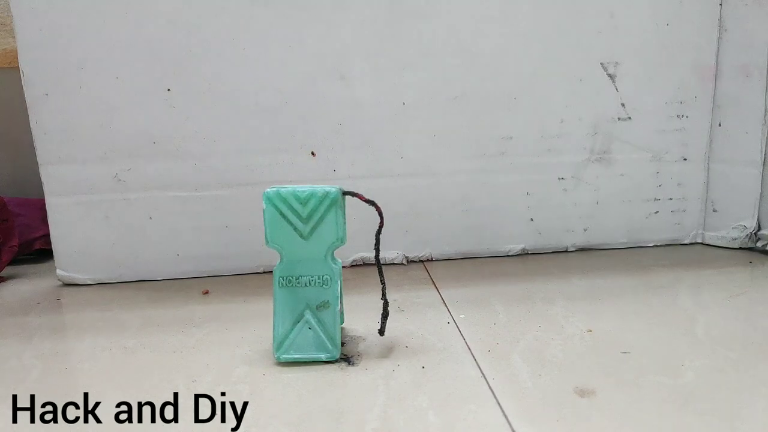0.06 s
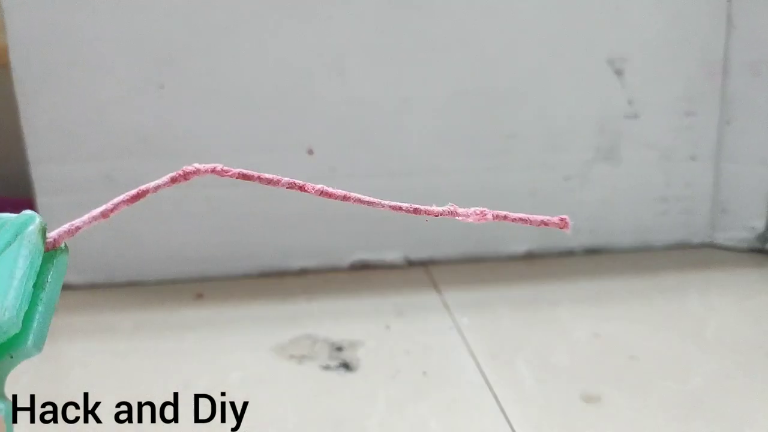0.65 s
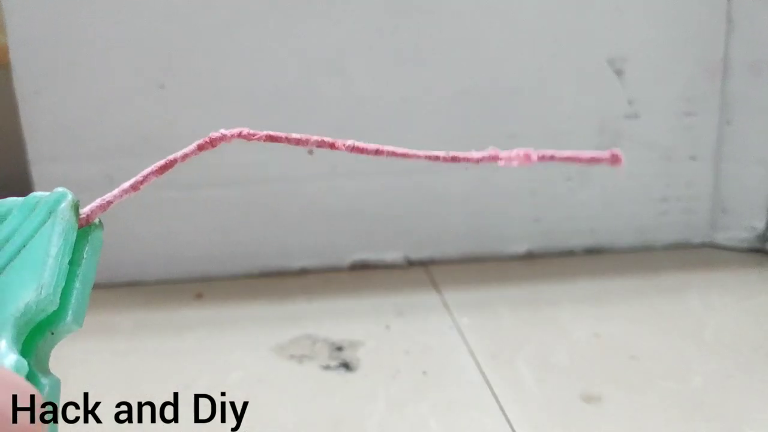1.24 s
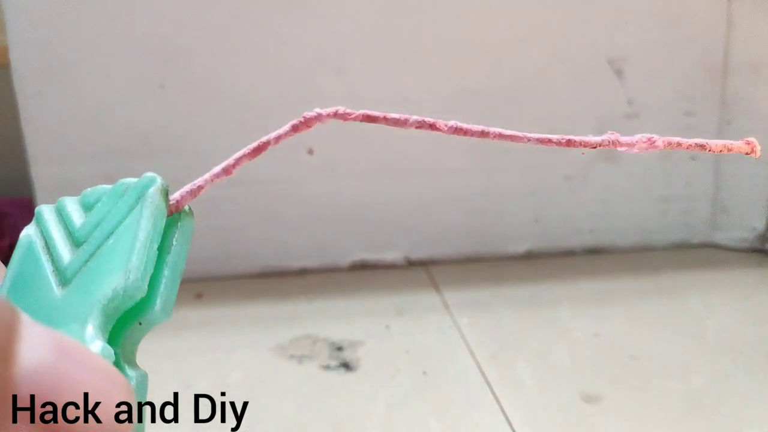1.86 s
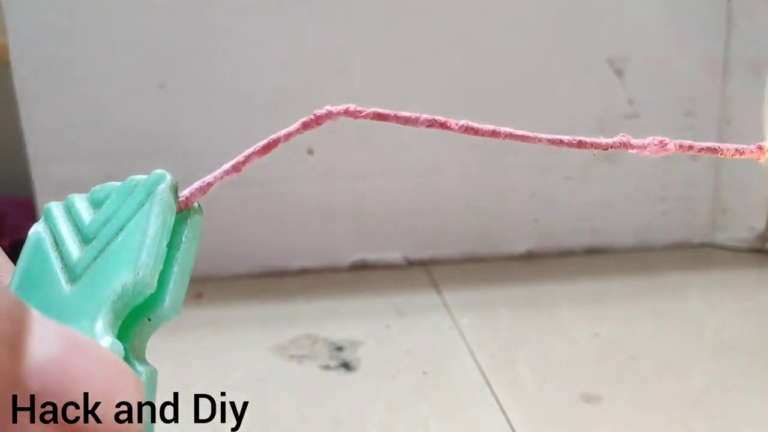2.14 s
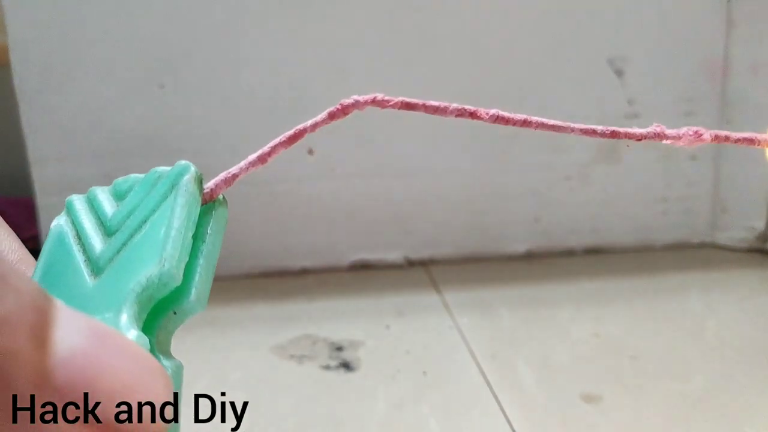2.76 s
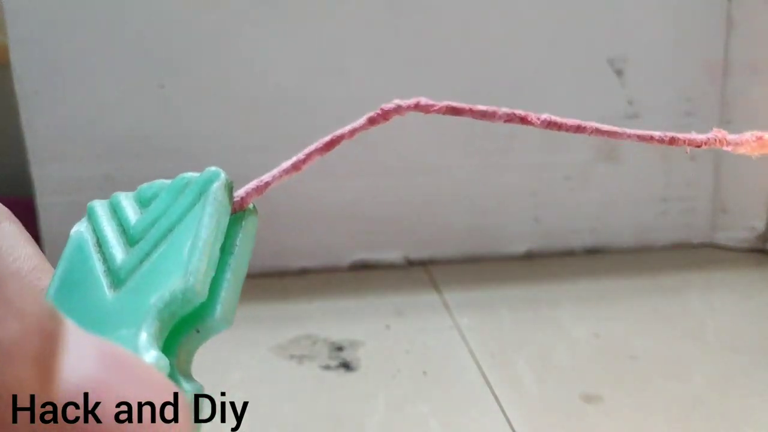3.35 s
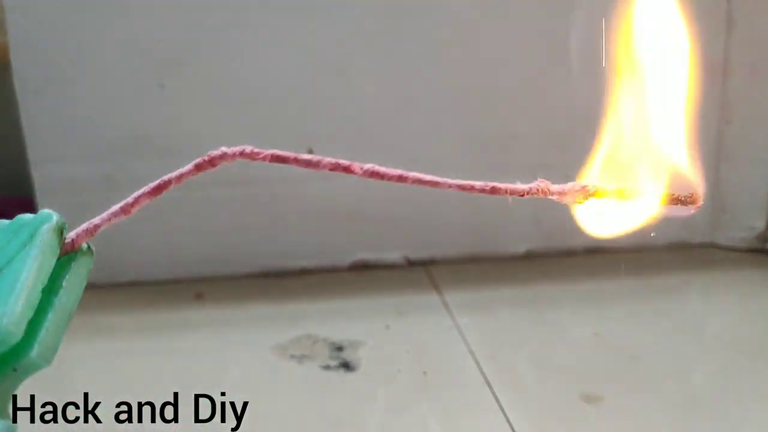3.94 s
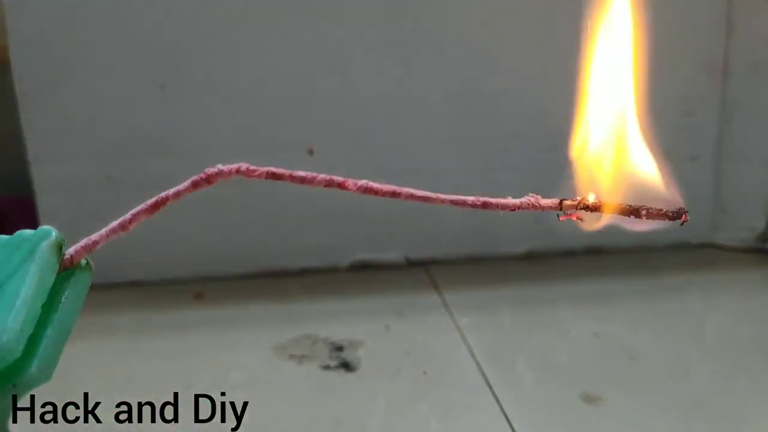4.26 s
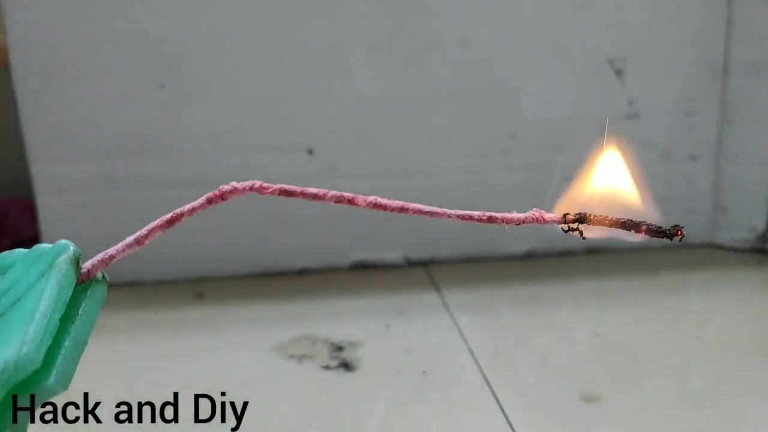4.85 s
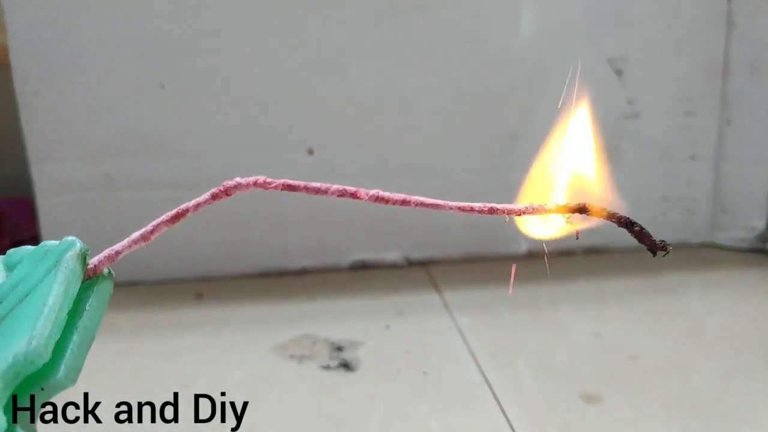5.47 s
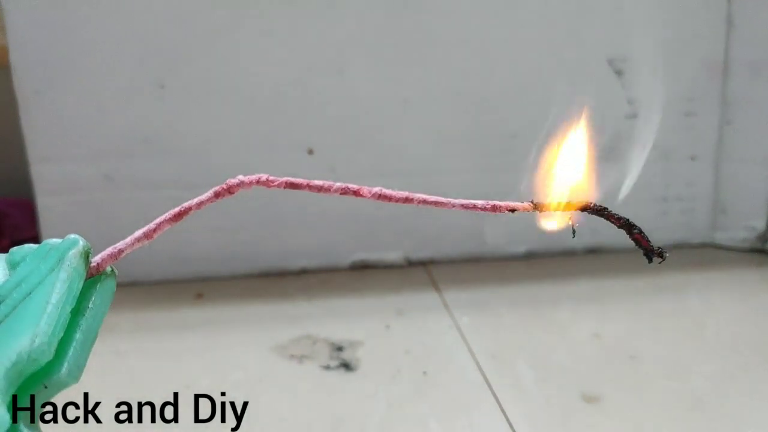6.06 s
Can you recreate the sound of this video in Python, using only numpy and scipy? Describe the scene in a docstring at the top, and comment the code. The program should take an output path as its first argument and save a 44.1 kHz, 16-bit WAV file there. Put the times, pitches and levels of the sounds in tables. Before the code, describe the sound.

The room is quiet, with faint air noise and a very low fan throb throughout. From about 0.4 seconds, fingers tick and rustle softly on a plastic casing close to the microphone, with a little low handling rumble. At 1.8 seconds a lighter clicks sharply, the loudest sound, and its gas catches with a soft low pop and brief flutter. Around 2.3 seconds a firecracker fuse begins to sizzle, building into a bright, uneven hiss with small spits and crackles. At 2.9 seconds the lighter's trigger springs back with a second sharp click. The fuse sputters most strongly between 3.2 and 4.3 seconds, with little puffs of gas, then sinks to almost nothing by 4.8 seconds. It revives just after 5 seconds, flares and spits around 5.5 seconds, and settles to a weak fizz until the end, just after 6 seconds.

```python
"""Lighting a firecracker fuse

A lighter clicks and lights a fuse close to a phone in a quiet, tiled room. Powder sizzles and spits,
escaping gas hisses, the trigger springs back, and the flame creeps along the cord, sinking and flaring.
Fingers rustle and tick on the plastic casing; a fan throbs very low in the background."""
import sys
import numpy as np
from scipy import signal
from scipy.fft import rfft, irfft
from scipy.io import wavfile

SR = 44100
rng = np.random.default_rng(int(sys.argv[2]) if len(sys.argv) > 2 else 0)


def waveform_to_disk(signal):
    """Save audio, clipped to [-1, 1], as 16-bit WAV at the path in sys.argv[1]."""
    frames = np.transpose(np.atleast_2d(signal))
    scaled = np.clip(frames, -1, 1) * 32767
    samples = np.round(scaled).astype(np.int16)
    wavfile.write(sys.argv[1], SR, samples)


N = 273861
T = np.arange(N) / SR
HZ = np.fft.rfftfreq(N, 1 / SR)


def amp(db):
    return 10 ** (np.asarray(db) / 20)


def unit_rms(x):
    return x / np.sqrt(np.mean(x ** 2) + 1e-20)


def spectrum(points, hz=HZ):
    """Interpolate (Hz, value) rows on a log-frequency axis."""
    knots_hz, values = np.transpose(points)
    return np.interp(np.log(hz + 1), np.log(knots_hz + 1), values)


def curves(rows):
    """Interpolate (seconds, values..) rows: one curve per value column."""
    times_s, *columns = np.transpose(rows)
    return [np.interp(T, times_s, column) for column in columns]


def pan(balance_db):
    """Constant-power stereo gains; positive is left."""
    ratio = np.atleast_1d(amp(balance_db))
    return np.array([ratio, np.ones_like(ratio)]) * np.sqrt(2 / (1 + ratio ** 2))


def colour(x, shape_db):
    """Filter that keeps the power of white noise: only the shape counts."""
    return irfft(rfft(x) * unit_rms(amp(shape_db)), N)


def noise():
    """Stereo white noise, alike in the bass."""
    # Each row: frequency in Hz, left-right correlation.
    coherence = [(100, 0.99), (300, 0.95), (640, 0.79), (1100, 0.32), (1550, 0.18), (2150, 0.44),
                 (4100, 0.14), (5900, -0.17), (7400, 0.033), (15000, 0)]
    left, other = rfft(rng.standard_normal((2, N)))
    alike = np.clip(spectrum(coherence), -1, 1)
    return irfft(np.array([left, alike * left + np.sqrt(1 - alike ** 2) * other]), N)


def burst(start_s, decay_s, rise_s):
    """Envelope: quick rise, exponential fall."""
    age_s = np.arange(SR // 5) / SR
    out = np.zeros(N)
    span = out[round(start_s * SR):][:len(age_s)]
    span += ((1 - np.exp(-age_s / rise_s)) * np.exp(-age_s / decay_s))[:len(span)]
    return out


def swell(start_s, hold_s, rise_s, fall_s):
    """Envelope: attack, hold, release."""
    age_s = np.maximum(T - start_s, 0)
    return (1 - np.exp(-age_s / rise_s)) * np.exp(-np.clip((age_s - hold_s) / fall_s, 0, 30))


def shower(per_s, decay_s, spread_db):
    """Power of random bursts of unequal size, mean 1."""
    sizes = amp(spread_db * np.minimum(rng.exponential(1, N), 4)) ** 2
    hits = sizes * (rng.random(N) < per_s / SR)
    power = signal.lfilter([1], [1, -np.exp(-1 / (decay_s * SR))], hits)
    return power / power.mean()


def wander(step_s):
    """Random drift, a new value every step."""
    knots_s = np.arange(0, T[-1] + step_s, step_s)
    return np.interp(T, knots_s, rng.standard_normal(N)[:len(knots_s)])


def resonance(x, hz, width_hz):
    """Double-pole resonance at unit RMS; hz may be a curve."""
    carrier = np.exp(2j * np.pi * np.cumsum(hz * np.ones(N)) / SR)
    pole = np.exp(-np.pi * width_hz / SR)
    baseband = signal.lfilter([1], np.poly([pole, pole]), x / carrier)
    return unit_rms((carrier * baseband).real)


def room(x):
    """Diffuse tail; the bass rings longest."""
    # Each row: frequency in Hz, T60 in seconds.
    reverb_times = [(200, 0.86), (1000, 0.31), (4000, 0.52), (8000, 0.41), (15000, 0.55)]
    t = T[:SR * 3 // 4]
    hz, age_s, frames = signal.stft(noise()[:, :len(t)], SR, nperseg=256)
    decay = amp(-60 * age_s / spectrum(reverb_times, hz)[:, None])
    tail = signal.istft(frames * decay, SR, nperseg=256)[1][:, :len(t)]
    tail *= np.clip(t / 0.0057, 0, 1) * (1 + 3.3 * np.exp(-t / 0.017))  # near walls answer first
    return signal.fftconvolve(x, tail / np.linalg.norm(tail[0]), axes=1)[:, :N]


def background(air_db=-56.5, fan_hz=30.5):
    """Low room air, faint hiss and a fan's throb."""
    # Spectra. Each row: frequency in Hz, relative density in dB.
    air_shape = [(20, -3.5), (45, -2.5), (70, -3.5), (120, 0.5), (200, -8), (300, -11), (450, -13.5),
                 (600, -35.5), (1000, -36), (1600, -53), (4000, -46)]
    hiss_shape = [(200, 6), (600, 13), (1100, 6), (1600, -1), (4000, -1.5), (7200, 1.5), (9000, -4),
                  (12000, -2.5), (16000, -0.5)]
    # Envelopes. Each row: time in seconds, level in dB.
    hiss_levels = [(0, -59), (.41, -60), (.44, -65), (2.2, -65.5), (6.2, -63)]
    fan_levels = [(0, -55), (.75, -54), (1.35, -65), (3.1, -48), (4.1, -48), (5.5, -42), (6.2, -46)]
    fan = np.sqrt(2) * amp(curves(fan_levels)[0]) * np.sin(2 * np.pi * fan_hz * T)
    hiss = amp(curves(hiss_levels)[0]) * colour(noise(), spectrum(hiss_shape))
    return amp(air_db) * colour(noise(), spectrum(air_shape)) + hiss + fan


def grip_envelopes():
    """Each shift of grip swells and fades in rustle, rumble, drone and scrape."""
    # Each row: start and hold in seconds, then rustle, rumble, drone and scrape in dB.
    grips = [(0.887, 0.041, -77, -53, -54, -88), (0.976, 0.22, -62, -70, -52.5, -85),
             (1.217, 0.16, -60.5, -74, -64, -72), (1.474, 0.15, -68, -54, -59, -90),
             (1.59, .25, -64.5, -61, -61, -88), (1.923, .14, -55, -55.5, -70, -80),
             (2.1, 0.28, -64.5, -62, -68, -87)]
    power = sum((amp(levels_db)[:, None] * swell(start_s, hold_s, rise_s=0.0098, fall_s=0.053)) ** 2
                for start_s, hold_s, *levels_db in grips)
    return np.sqrt(power)


def casing(drone, scrape):
    """Sliding skin sets the phone's case droning and scraping."""
    friction = noise()
    low = drone * resonance(friction, hz=71.8, width_hz=11)
    return low + scrape * resonance(friction, hz=1320, width_hz=250) * pan(4.0)


def fingers(rustle, rumble, tremor_db=-63):
    """Skin rubs and ticks on plastic while the hand jostles the phone."""
    # Each row: start in seconds, level in dB, decay in seconds, brightness from 0 to 1.
    ticks = [(.42, -50.5, 0.011, 0.3), (1.005, -54, 0.012, 1), (1.1897, -40.5, 0.0013, 0.77),
             (1.367, -48, .0018, .5), (1.498, -45.5, 0.0019, 0.7), (1.542, -49, .0017, 0.1),
             (1.609, -35, 0.011, 0.99), (1.7402, -45, .0024, 0), (1.752, -46.5, .003, 0),
             (2.028, -41.5, .0037, 0), (2.239, -49, 0.0041, 0)]
    # Spectra. Each row: frequency in Hz, relative density in dB.
    rustle_shape = [(300, -1), (1400, -4.5), (2500, -1.5), (5000, -0.5), (7000, 1), (8500, -5),
                    (12000, 4.5), (16000, -6)]
    slip_shape = [(1000, -18.5), (7000, -32), (9300, -5.5), (11000, -4), (14000, -8.5), (16000, -18)]
    rumble_shape = [(20, -9), (52, -8), (70, -0.5), (92, -7), (130, -7), (250, -25), (600, -40.5)]
    dull, sharp = np.zeros((2, N))
    for start_s, db, decay_s, brightness in ticks:
        touch = amp(db) * burst(start_s, decay_s, rise_s=0.0002 + 45 * decay_s ** 2)  # long slips: soft
        dull += np.sqrt(1 - brightness) * touch
        sharp += np.sqrt(brightness) * touch
    grain = np.sqrt(0.55 + 0.13 * shower(per_s=150, decay_s=0.0006, spread_db=4.0))
    rub = colour(noise() * np.hypot(rustle * grain, dull), spectrum(rustle_shape))
    slip = colour(noise() * sharp, spectrum(slip_shape))
    jostle = np.hypot(rumble, amp(tremor_db)) * colour(noise(), spectrum(rumble_shape))
    return (rub + slip) * pan(3.9) + jostle


def ignition(flutter_db=-45.0):
    """Gas catches with a soft low pop and a brief flutter of flame."""
    # Spark, catching gas, hot air. Each row: start in seconds, peak pressure, rise in seconds, pan in dB.
    pulses = [(1.8458, -0.051, 0.0011, 23), (1.845, -0.032, 0.016, 24), (1.908, -0.049, 0.0024, 2),
              (1.882, 0.056, 0.1, 27)]
    pop = np.zeros((2, N))
    for start_s, pressure, rise_s, pan_db in pulses:
        age = np.maximum((T - start_s) / rise_s, 0)
        pop += pan(pan_db) * pressure * age ** 2 * np.exp(2 * (1 - age))
    flame_db = spectrum([(40, -6), (170, -4), (350, -6), (560, -1), (800, -27), (3000, -47)])
    flutter = colour(noise(), flame_db) * burst(1.902, decay_s=0.029, rise_s=0.003)
    return pop + amp(flutter_db) * flutter


def lighter():
    """The trigger goes down, snaps and springs back: each click cracks, rings the body and echoes."""
    # Each row: start in seconds, ring and crack in dB, T60 factor, room send in dB, tilt in dB/octave.
    clicks = [(1.8194, -38.5, -35, 0.72, -4, 0), (1.844, -22, -37, 0.66, -16, -3),
              (1.846, -1, -10, 0.8, -10.5, -0.5), (1.8480, -10, -14.5, 0.77, -15, -4),
              (1.8497, -17, -38, 0.68, -15, -7.5), (2.9185, -3, -15.5, 0.46, -13.5, -1.5),
              (2.9213, -18, -24, 0.82, -21, -7)]
    # Body modes. Each row: frequency in Hz, relative level in dB, base T60 in seconds, pan in dB.
    modes = [(1350, -22, 0.0032, 5), (2140, -23, 0.0035, 0), (3010, -18.5, 0.013, 22),
             (3540, -28, 0.0047, 12), (4680, -7, 0.0084, 2), (5320, -10, 0.013, -6),
             (6250, -19.5, 0.0077, -15), (7100, -7.5, 0.016, -9), (8000, -17, 0.013, 1.5),
             (9300, -17.5, 0.011, 3), (11180, -9.5, 0.018, 1.5), (11930, -9.5, 0.012, 4.5),
             (12600, -2, 0.0096, 9), (14590, -10, 0.014, 7)]
    # Spectra of the crack and of sideways radiation. Each row: frequency in Hz, relative level in dB.
    crack_shape = [(100, -20), (800, -10.5), (1500, -0.5), (3500, 5), (8000, 9), (11000, -3.5),
                   (16000, -16)]
    sideways_shape = [(300, -17.5), (1500, -25), (2200, -6.5), (3000, -2.5), (3900, -11), (5400, 4.5),
                      (6700, 3), (8600, -5), (11800, 1), (13500, -4), (16000, -8)]
    t = np.arange(SR // 20) / SR
    cracks = sum(amp(db) * burst(start_s, decay_s=0.0015, rise_s=0.0001) for start_s, _, db, *_ in clicks)
    direct = colour(noise() * cracks, spectrum(crack_shape)) * pan(6.4)
    send = np.zeros((2, N))
    for start_s, ring_db, _, t60_factor, send_db, tilt_db in clicks:
        ring = np.zeros((2, len(t)))
        for hz, db, t60_s, pan_db in modes:
            envelope = amp(db + tilt_db * np.log2(hz / 7000) - 60 * t / (t60_s * t60_factor))
            ring += pan(pan_db) * envelope * np.sin(2 * np.pi * (hz * t + rng.random((2, 1))))
        onset = round(start_s * SR)
        direct[:, onset:onset + len(t)] += amp(ring_db) * ring * (1 - np.exp(-t / 0.00028))
        send[:, onset] += amp(ring_db + send_db) * np.linalg.norm(ring[0])
    return direct + room(colour(send, spectrum(sideways_shape))) * pan(-3.5)


def scatter(x, paths=5, sway_s=0.00006, step_s=0.45):
    """Hand and casing reflect the treble; the paths sway, so ripples slide through the hiss."""
    treble = irfft(rfft(x) / (1 + (2600 / (HZ + 1)) ** 4), N)
    knots_s = np.arange(0, T[-1] + 1, step_s)
    out = x.copy()
    for side in range(2):
        for delay_s in rng.uniform(0.000789, 0.005, paths):
            sway = np.interp(T, knots_s, rng.standard_normal(len(knots_s)))
            out[side] += 0.29 * np.interp(T - delay_s - sway_s * sway, T, treble[side])
    return out


def corner_ripple_db():
    """Echoes off the floor and a cardboard wall add and cancel."""
    # Each row: centre and half width in Hz, gain in dB.
    bands = [(190, 15, 5), (461, 107, 4), (707, 107, -12), (878, 46, 7), (1283, 150, 3), (1530, 115, -6.5),
             (2180, 240, 2), (2514, 127, -12), (3310, 190, -5), (3750, 150, -3), (4000, 85, 3),
             (6590, 170, 5), (8000, 280, -8), (9950, 130, 3.5)]
    return sum(db * np.exp(-((HZ - hz) / width_hz) ** 2) for hz, width_hz, db in bands)


def hand_shield(x, hz=1520, width_hz=166):
    """The echo of the hand shielding the tip cancels part of one band common to both channels."""
    # Each row: time in seconds, share cancelled.
    depths = [(2.3, 0.9), (3.05, 0.6), (3.5, 0.3)]
    common = irfft(rfft(x.mean(0)) * np.exp(-((HZ - hz) / width_hz) ** 2), N)
    return x - curves(depths)[0] * common


def burn_envelope(lit_s=2.16, catch_s=0.11):
    """Powder burns unevenly: pockets flare over a base roughened by surges, puffs and snaps."""
    # The base burn builds, sinks and revives. Each row: time in seconds, level in dB.
    base_levels = [(2.2, -67), (2.57, -60.5), (2.76, -51.5), (2.95, -51.5), (3.21, -51), (3.3, -46.5),
                   (3.46, -48), (3.52, -52.5), (3.76, -47.5), (4.12, -48.5), (4.19, -52), (4.55, -62.5),
                   (4.76, -68), (5.02, -66.5), (5.14, -60.5), (5.62, -54), (5.75, -62.5), (6.21, -61.5)]
    # Each row: start in seconds, level in dB, hold in seconds.
    pockets = [(2.327, -51.5, 0.025), (2.449, -51.5, 0.035), (2.498, -55.5, .016), (3.264, -54, .017),
               (3.353, -45, 0.011), (3.439, -43, 0.02), (4.07, -46.5, 0.026), (4.274, -47.5, 0.035),
               (4.48, -56.5, 0.035), (5.145, -54, .012), (5.363, -49, 0.009), (5.419, -49, 0.013),
               (5.491, -53, 0.081), (5.58, -51, 0.083), (5.827, -56.5, .008), (5.941, -58, 0.022)]
    flares = sum(amp(db) * swell(start_s, hold_s, rise_s=0.003, fall_s=0.026)
                 for start_s, db, hold_s in pockets)
    burn = np.hypot(amp(curves(base_levels)[0]), flares) * np.clip((T - lit_s) / catch_s, 0, 1)
    surges = shower(per_s=45, decay_s=0.011, spread_db=1.2)
    puffs = shower(per_s=300, decay_s=0.0025, spread_db=2.6)
    snaps = shower(per_s=700, decay_s=0.00015, spread_db=5.5)
    return burn * np.sqrt(0.19 + 0.23 * surges + 0.42 * puffs + 0.37 * snaps)


def sizzle(burn, spits, burn_gain_db=1.0, spit_gain_db=-3.5):
    """Burning powder, bursting grains and dull gusts of gas from the cord."""
    # Spectra. Each row: frequency in Hz, relative density in dB.
    powder_shape = [(60, -9), (180, 0.5), (450, 2), (1000, 1.5), (2000, -2), (3300, -4.5), (5200, -2.5),
                    (7000, -5), (8200, -1), (10000, -11), (16000, -28.5)]
    gust_shape = [(100, -37), (450, 5), (1200, 1), (1700, -8), (4000, -35)]
    # Each row: start in seconds, level in dB.
    gust_events = [(3.263, -40.5), (3.454, -35.5), (4.296, -42.5), (5.593, -41.5), (5.827, -48.5)]
    gusts = sum(amp(db) * burst(start_s, decay_s=0.012, rise_s=0.0026) for start_s, db in gust_events)
    powder_db = spectrum(powder_shape) + corner_ripple_db()
    grain_db = powder_db + spectrum([(300, -5.5), (1500, -6.5)])
    out = amp(burn_gain_db) * colour(noise() * burn, powder_db)
    out += amp(spit_gain_db) * colour(noise() * spits, grain_db)
    return out + colour(noise() * gusts, spectrum(gust_shape) + corner_ripple_db())


def jet(burn, spits, spit_gain_db=-5.5, stray_hz=450):
    """Gas escapes with a bright rush, a broad whistle and a rasp that change as the tip burns open."""
    # Each row: frequency in Hz, relative density in dB.
    rush_shape = [(5000, -30.5), (8000, -17.5), (9800, -6.5), (12500, -3), (14000, -5), (16000, -7.5)]
    # Each row: time in seconds, gain on the burn in dB, whistle in Hz, whistle and rasp re rush in dB.
    vent = [(2.3, 1, 12600, -3, -11.5), (2.85, 0.5, 12200, -2.5, -9.5), (3.15, -3, 11100, 1, -15),
            (3.42, -3, 10600, 1.5, -14), (3.6, -6.5, 12200, 4.5, -25), (4.3, -3, 11900, -4.5, -24),
            (6.2, -1, 13000, -8, -39)]
    gain_db, whistle_hz, whistle_db, rasp_db = curves(vent)
    rush = colour(noise(), spectrum(rush_shape) + corner_ripple_db())
    whistle = resonance(noise(), whistle_hz + stray_hz * wander(step_s=0.07), width_hz=1900)
    rasp = 1.09 * resonance(noise(), hz=3650, width_hz=1600)
    rasp += 0.31 * resonance(noise(), hz=5730, width_hz=2000)
    drive = np.hypot(amp(gain_db) * burn, amp(spit_gain_db) * spits)
    return drive * (rush + amp(whistle_db) * whistle + amp(rasp_db) * rasp)


def fuse():
    """One sputtering burn drives both sizzle and jet; the flame drifts slightly right."""
    # Single powder grains bursting. Each row: start in seconds, level in dB, decay in seconds.
    grains = [(2.457, -39, 0.0056), (2.505, -37.5, 0.0065), (2.668, -36, 0.0025), (2.7, -35, .004),
              (2.7295, -34.5, 0.0053), (2.794, -30.5, 0.0016), (2.86, -29, 0.0035), (3.0145, -30, 0.0011),
              (3.041, -30.5, 0.0031), (3.2556, -31, 0.0035), (3.407, -29.5, 0.0034), (4.214, -37.5, 0.0044),
              (5.0502, -40.5, .0028), (5.079, -36.5, .0045), (5.297, -43, 0.0032), (5.428, -32.5, 0.0074),
              (5.8299, -39, 0.0031)]
    # Each row: time in seconds, pan in dB.
    flame_path = [(3.4, -0.2), (3.8, -2.4)]
    burn = burn_envelope()
    spits = sum(amp(db) * burst(start_s, decay_s, rise_s=0.00069) for start_s, db, decay_s in grains)
    flame = hand_shield(sizzle(burn, spits)) + jet(burn, spits) * pan(9.2)
    return scatter(flame) * pan(curves(flame_path)[0])


def scene():
    """Fuse, fingers and lighter close by, in a quiet room."""
    rustle, rumble, drone, scrape = grip_envelopes()
    close = fuse() + fingers(rustle, rumble)
    return lighter() + ignition() + close + amp(-12.5) * room(close) + casing(drone, scrape) + background()


def record(dry, cutoff_hz=15900):
    """Left microphone is bright, right favours the upper mids; clipping and low-pass follow."""
    # Each row: frequency in Hz, left over right in dB.
    mic_balance = [(600, 1), (2000, 3), (3200, -2.5), (5000, -2.5), (7200, -2.5), (8300, 5), (10000, 9.5),
                   (12000, 10.5), (14000, 11), (16000, 14)]
    clipped = np.clip(irfft(rfft(dry) * pan(spectrum(mic_balance)), N), -1, 1)
    lowpass = signal.firwin(401, cutoff_hz, window=("kaiser", 8), fs=SR)
    return signal.oaconvolve(clipped, lowpass[None], "same")


dry = scene()
out = record(dry)
waveform_to_disk(out)
```